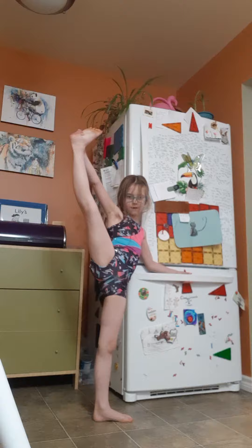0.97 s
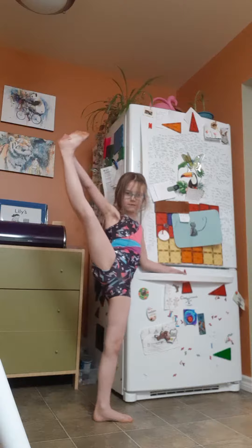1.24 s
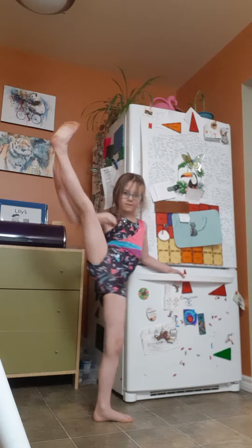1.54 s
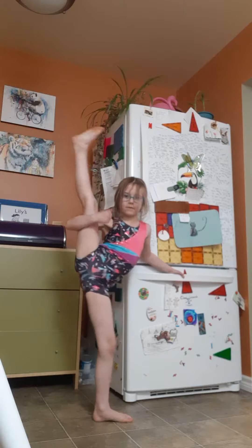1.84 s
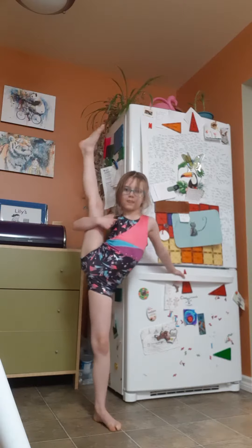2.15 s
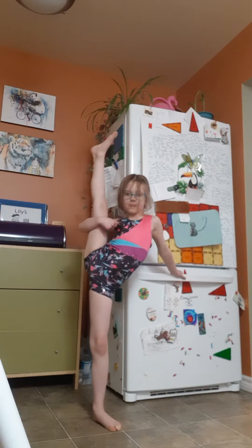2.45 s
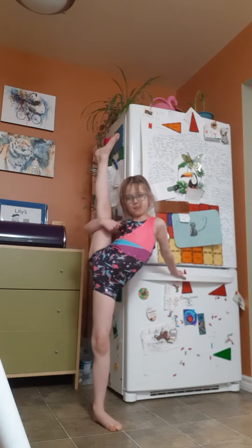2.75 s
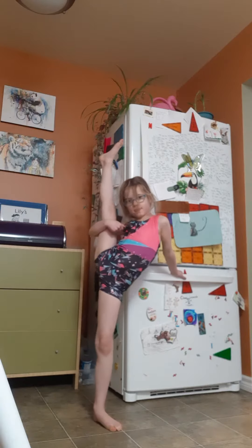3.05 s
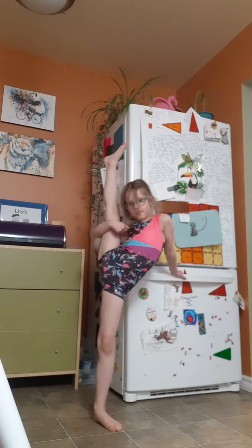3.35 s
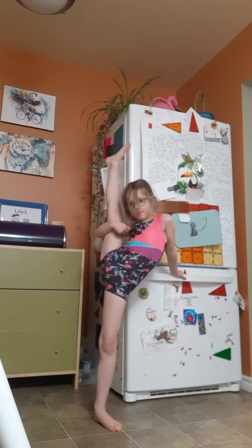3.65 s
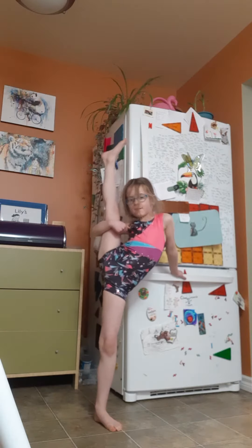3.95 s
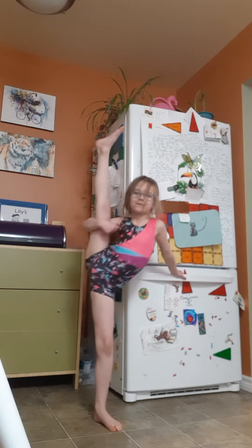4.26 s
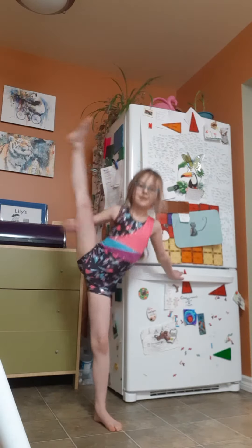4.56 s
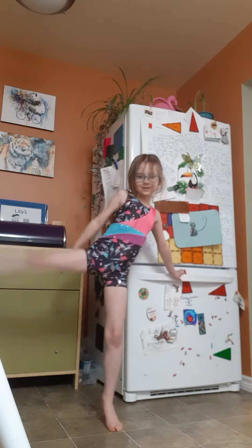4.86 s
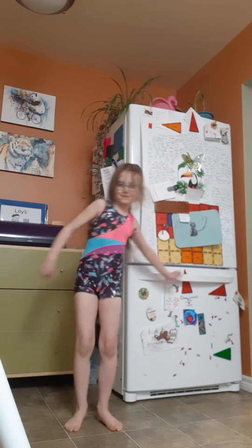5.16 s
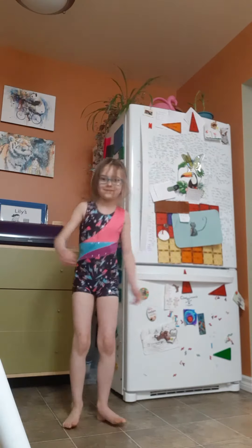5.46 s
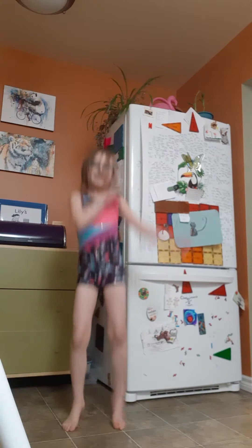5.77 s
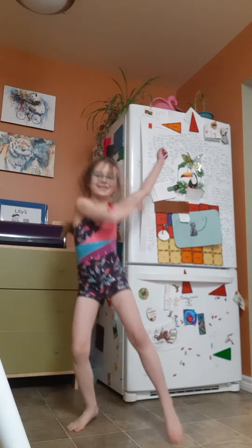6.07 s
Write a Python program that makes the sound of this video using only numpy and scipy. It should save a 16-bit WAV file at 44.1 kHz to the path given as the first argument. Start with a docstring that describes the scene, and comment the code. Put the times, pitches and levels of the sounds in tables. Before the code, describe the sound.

Something is scrubbed rapidly in a tiled kitchen, each stroke scraping and hissing over a faint rumble and a few small clicks. The rubbing pauses briefly twice and starts again. Near the end a bare foot lands with a dull thump, followed by soft shuffling and scuffs as the strokes grow lighter. The stereo microphone picks up short reflections from hard walls.

```python
"""In a tiled kitchen something is scrubbed from the start, about nine strokes a second. Stick-slip
friction scrapes and hisses, while the rubbed thing rumbles and bumps on its support. A light footfall
comes at 1.9 s; the scrubbing pauses near 2.5 s and 4 s. At 5.1 s a bare foot thumps the floor and
excites its modes, then the feet shuffle and the soles scuff the tile as the strokes grow lighter.
Throughout, hard walls reflect the sound to a microphone with two ports."""
import sys
import numpy as np
from scipy import signal
from scipy.fft import rfft, irfft, next_fast_len
from scipy.io import wavfile
from scipy.ndimage import map_coordinates

SR = 44100
rng = np.random.default_rng(int(sys.argv[2]) if len(sys.argv) > 2 else 0)


def bounce(signal):
    """Save signal as a 16-bit WAV file at the path given by the first command-line argument."""
    frames = np.transpose(np.atleast_2d(signal))
    limited = np.clip(frames, -1, 1)
    pcm = np.round(limited * 32767).astype(np.int16)
    wavfile.write(sys.argv[1], SR, pcm)


N = 270333
TIME = np.arange(N) / SR


def amp(db):
    """Amplitude ratio of a level in decibels."""
    return 10 ** (np.asarray(db) / 20)


def unit(x):
    """Normalisation to rms 1."""
    return x / np.sqrt(np.mean(x ** 2) + 1e-20)


def along(points, hz):
    """Interpolation of (f/Hz, value) points on a logarithmic frequency axis."""
    f, values = np.transpose(points)
    return np.interp(np.log(hz + 1), np.log(f + 1), values)


def filtered(x, response):
    """Linear filtering: the spectrum is multiplied by a complex frequency response."""
    size = next_fast_len(N + SR // 2)
    return irfft(rfft(x, size) * response(np.fft.rfftfreq(size, 1 / SR)), size)[..., :N]


def coloured(x, spectrum):
    """Spectral shaping by (f/Hz, relative level/dB) points, at rms 1."""
    return unit(filtered(x, lambda hz: amp(along(spectrum, hz))))


def add(track, at, sound):
    """Superposition of a short sound on a track, starting at a time in seconds."""
    part = track[round(at * SR):][:len(sound)]
    part += sound[:len(part)]


def swells(at, rise, fall, db):
    """Incoherent addition: the Gaussian envelopes of separate movements sum in power."""
    t = TIME[::32]
    offset = t - at[:, None]
    width = np.where(offset < 0, rise[:, None], fall[:, None])
    envelopes = amp(db)[:, None] * np.exp(-(offset / width) ** 2)
    return np.interp(TIME, t, np.linalg.norm(envelopes, axis=0))


def friction(spectrum, rate, spread_db, smooth):
    """Stick-slip friction: random slips of uneven size, rate a second, over smooth sliding noise."""
    size = amp(spread_db * np.minimum(rng.standard_exponential(N), 5))
    slips = (rng.random(N) < rate / SR) * size * rng.choice([-1, 1], N)
    return coloured(unit(slips) + smooth * rng.standard_normal(N), spectrum)


def ticks(contacts, spectrum, t60):
    """Damped impacts: each (t/s, peak level/dB) contact is an exponentially decaying noise burst."""
    track, t = np.zeros(N), TIME[:SR // 4]
    grain = coloured(rng.standard_normal(N), spectrum)
    for at, db in contacts:
        burst = np.roll(grain, -round(at * SR))[:len(t)] * amp(-60 * t / t60)
        add(track, at, amp(db) * burst / np.abs(burst).max())
    return track


# Reverberation time of the kitchen: f/Hz, T60/s
REVERB_TIME = [(100, 0.26), (500, 0.39), (3000, 0.34), (8000, 0.32), (15000, 0.35)]

def kitchen(x, wet_db, early_db, lead_s, positions=2):
    """Reverberation: direct sound reaches the left port first; reflections vary with source position."""
    noise = rng.standard_normal((positions, 2, SR // 3), dtype=np.float32)
    hz, t, spectra = signal.stft(noise, SR, nperseg=256)
    decay = amp(-60 * t / along(REVERB_TIME, hz)[:, None]) + amp(early_db - 60 * t / 0.017)
    tails = signal.istft(spectra * decay.astype(np.float32), SR, nperseg=256)[1]
    tails /= np.linalg.norm(tails, axis=-1, keepdims=True)
    echo, hop = np.zeros((2, N)), N // (positions - 1) + 1
    for k, pair in enumerate(tails):
        span = np.arange(max(0, (k - 1) * hop), min(N, (k + 1) * hop))
        piece = x[span] * np.cos(np.pi / 2 * (span / hop - k))  # equal-power crossfade
        for port, tail in zip(echo, pair):
            add(port, span[0] / SR, signal.fftconvolve(piece, tail))
    direct = filtered(x, lambda f: np.exp(1j * np.pi * f * lead_s * np.array([[1], [-1]])))
    return (direct + amp(wet_db) * echo) / np.hypot(1, amp(wet_db))


# Spectrum of the room's air: f/Hz, level/dB
AIR_SPECTRUM = [(20, -11), (90, 10), (200, 1), (400, -6), (1000, -14), (3000, -38), (8000, -23),
                (16000, -13)]

def room_tone():
    """Ambient noise: a faint murmur and hiss, partly coherent between the ports."""
    return amp(-73) * coloured(rng.standard_normal((2, N)) + 1.5 * rng.standard_normal(N), AIR_SPECTRUM)


# Light knocks: t/s, relative peak level/dB
KNOCK_EVENTS = [(.143, -37), (1.876, -39.5), (4.779, -33.5), (4.82, -42), (5.69, -37.5)]
# Spectrum of a knock: f/Hz, level/dB
KNOCK_SPECTRUM = [(60, -9), (200, -15), (500, -6.5), (820, -4), (1500, -11), (4000, 1.5), (12000, -16.5)]

def knocks():
    """Impulsive excitation: brief contacts give broadband sound that dies quickly."""
    return amp(5) * ticks(KNOCK_EVENTS, KNOCK_SPECTRUM, t60=0.084)


# Soles twisting on the tile: t/s of the peak, rise/s, fall/s, level/dB
SOLE_TWISTS = [(5.15, 0.014, 0.06, -61), (5.28, 0.05, 0.03, -64), (5.625, 0.042, 0.052, -62),
               (6.1, 0.03, 0.04, -58)]
# Spectra of skin sliding and of skin sticking: f/Hz, level/dB
SOLE_SPECTRUM = [(80, -20), (250, -8), (450, -4.5), (560, 2.5), (660, -4), (760, -3), (900, -13),
                 (1500, -25), (4000, -38)]
SQUEAK_SPECTRUM = [(480, -40), (590, 1), (630, -4), (680, -4), (820, -40)]

def scuffs():
    """Friction of skin on tile: sliding gives a dull rub, sticking a narrow-band squeak."""
    rub = friction(SOLE_SPECTRUM, rate=830, spread_db=4.5, smooth=1.0)
    squeak = amp(-3) * friction(SQUEAK_SPECTRUM, rate=520, spread_db=1.5, smooth=0.5)
    return swells(*np.transpose(SOLE_TWISTS)) * (rub + squeak)


# Footfalls: t/s, relative level/dB, contact time/s, f/Hz below which modes are weakly excited
FOOTFALLS = [(1.874, -43.5, 0.003, 220), (4.625, -47.5, 0.0051, 91), (5.092, -30, 0.0032, 230),
             (5.106, -41, 0.0027, 230), (5.132, -27.5, 0.0036, 35.2), (5.238, -39.5, 0.0027, 120),
             (5.302, -43, 0.0026, 158), (5.42, -46.5, 0.0051, 119), (5.678, -47, 0.0045, 169),
             (5.944, -51, 0.0061, 46), (6.075, -47, 0.0048, 160)]
# Modes of the floor: f/Hz, level/dB, T60/s
FLOOR_MODES = [(58.4, -5, 0.46), (79.1, 6.5, 0.29), (138.4, 0.5, 0.39), (170.3, 5, 0.11), (215, -14, 0.53),
               (252, -20, 0.12), (284, -7, 0.21), (377, -8.5, 0.26), (440, -4.5, 0.31), (536, -9, .15)]
# Spectrum of the dull, unpitched slap of the foot's flesh: f/Hz, level/dB
THUD_SPECTRUM = [(50, -30), (100, -9), (200, -1), (300, -0.5), (400, -21), (900, -40), (3000, -65)]

def footfalls():
    """Modal excitation: soft flesh gives the floor a half-sine push; longer contact is duller."""
    track, t = np.zeros(N), TIME[:SR // 2]
    hz, mode_db, t60 = np.transpose(FLOOR_MODES)[:, :, None]
    for at, db, contact, lowest_hz in FOOTFALLS:
        # toes stir only the higher modes, a heel bends the whole floor
        coupling = hz ** 2 / (hz ** 2 + lowest_hz ** 2)
        size = coupling * amp(mode_db + rng.normal(0, 0.91, hz.shape))
        ring = np.sum(size * amp(-60 * t / t60) * np.cos(2 * np.pi * hz * t), axis=0)
        push = np.sin(np.pi * np.minimum(t / contact, 1))
        thump = signal.fftconvolve(ring, push / push.sum())[:len(t)]
        onset = 1 - np.exp(-t / 0.0038)
        add(track, at, amp(db) * thump * onset)
    track += amp(-15.5) * ticks([row[:2] for row in FOOTFALLS], THUD_SPECTRUM, t60=0.29)
    # the floor radiates little of its slowest motion
    track = signal.sosfilt(signal.butter(2, 50, "high", fs=SR, output="sos"), track)
    return kitchen(track, wet_db=-8.5, early_db=-2, lead_s=0.00028) * amp([[-0.7], [0.7]])


# Scrubbing strokes: t/s of the peak, length/s, level/dB
SCRUB_STROKES = [(0.031, .07, -41.5), (0.125, 0.15, -48.5), (0.246, 0.084, -45), (0.35, .08, -42.5),
                 (0.451, 0.077, -42), (.551, 0.084, -44.5), (0.663, 0.078, -42.5), (0.76, 0.089, -45.5),
                 (0.878, 0.072, -40), (0.964, .12, -47.5), (1.081, 0.079, -40.5), (1.156, .12, -44.5),
                 (1.271, 0.055, -39.5), (1.369, 0.11, -47.5), (1.488, 0.07, -39), (1.588, 0.092, -41),
                 (1.711, .06, -40), (1.811, 0.081, -41.5), (1.928, 0.084, -44), (2.032, 0.077, -43),
                 (2.142, 0.07, -45.5), (2.237, 0.072, -46.5), (2.317, 0.14, -54.5), (2.514, 0.08, -64),
                 (2.599, 0.13, -69), (2.769, 0.081, -43), (2.895, .1, -34), (3.028, 0.12, -33),
                 (3.142, 0.063, -36.5), (3.206, 0.2, -43), (3.399, 0.11, -35), (3.467, 0.098, -37),
                 (3.603, 0.13, -42), (3.712, 0.066, -38), (3.779, 0.036, -42), (3.843, 0.098, -39.5),
                 (3.977, 0.12, -55.5), (4.163, 0.042, -46), (4.262, 0.091, -37), (4.378, 0.093, -41),
                 (4.496, 0.085, -47), (4.586, .17, -44), (4.738, 0.072, -45), (4.809, 0.098, -45),
                 (4.93, 0.13, -45.5), (5.038, 0.087, -43), (5.145, 0.14, -43.5), (5.274, 0.081, -42),
                 (5.393, 0.14, -43), (5.515, 0.11, -43.5), (5.648, .13, -43), (5.785, 0.15, -47),
                 (5.925, 0.087, -47), (6.078, 0.093, -44.5)]
# How hard the hand bears down: t/s, relative level/dB
HAND_PRESSURE = [(.4, 0.5), (.62, -6), (.9, 3.5), (1.85, 2.5), (2.25, -5), (2.6, -3.5), (2.9, 0), (3.6, 2),
                 (3.85, 1), (4.0, -25), (4.25, 0.5), (4.58, 2.5), (4.74, -5), (4.82, 9), (4.95, -22),
                 (5.15, 3), (5.5, -13), (5.66, -8.5), (5.85, -39)]
USUAL_STROKE_S, USUAL_STROKE_DB = 0.09, -43
SCRUB_LEAD_S = 0.000423  # earlier arrival at the left port

def strokes():
    """Reciprocating motion: each stroke speeds up, then slows, under the hand's pressure."""
    at, length, db = np.transpose(SCRUB_STROKES)
    rise_share = 0.52
    doublings = np.log2(length / USUAL_STROKE_S)
    pressure_db = np.interp(at, *np.transpose(HAND_PRESSURE))
    return at, rise_share * length, (1 - rise_share) * length, db, doublings, pressure_db


# The rubbed thing rocks against its support: t/s, relative level/dB
ROCKING = [(.16, -63.5), (0.462, -56), (.56, -61.5), (.675, -61), (.77, -65), (.885, -56), (.96, -60),
           (1.086, -54), (1.17, -58), (1.6, -56), (3.06, -69), (3.45, -67)]
# Rumble under a usual stroke: t/s, level/dB
RUMBLE_CONTOUR = [(0, -64), (1.9, -63.5), (2.3, -70), (3.2, -66.5), (3.6, -63), (3.85, -65), (4.1, -72),
                  (4.5, -65.5), (6, -63.5)]
# Spectrum of the shaken support: f/Hz, level/dB
RUMBLE_SPECTRUM = [(20, -30), (45, -15), (75, -16.5), (103, 7), (135, -2), (190, -11), (300, -15),
                   (600, -63)]
# Resonances of the rubbed thing's hollow: f/Hz, level/dB
HOLLOW_SPECTRUM = [(120, -39), (260, -15.5), (305, -3), (345, -6.5), (410, -8.5), (450, -5), (500, -11.5),
                   (620, -15), (1200, -62)]

def support(rumble_lag_s=0.011, hollow_hz=306.4):
    """Forced vibration and resonance: strokes and bumps shake the support and ring the hollow."""
    at, rise, fall, db, _, pressure_db = strokes()
    bump_at, bump_db = np.transpose(ROCKING)
    bumps = swells(bump_at, rise=np.full_like(bump_at, 0.032), fall=np.full_like(bump_at, 0.044),
                   db=bump_db)
    shake_db = np.interp(at, *np.transpose(RUMBLE_CONTOUR)) + 0.2 * (db - USUAL_STROKE_DB)
    shake = swells(at + rumble_lag_s, rise, fall, shake_db)
    rumble = np.hypot(shake, amp(-3) * bumps) * coloured(rng.standard_normal(N), RUMBLE_SPECTRUM)
    drive = np.hypot(swells(at, rise, fall, db - 34.5 + pressure_db), amp(-2.5) * bumps)
    rattle = drive * friction(HOLLOW_SPECTRUM, rate=300, spread_db=3.0, smooth=1.0)
    note = amp(-3) * bumps * np.sin(2 * np.pi * (hollow_hz * TIME + rng.random()))
    return kitchen(rumble + rattle + note, wet_db=-4, early_db=-26, lead_s=0.0001, positions=8)


# Spectrum of the rubbing hiss: f/Hz, level/dB
HISS_SPECTRUM = [(2000, -39), (4500, 5), (7000, -1.5), (9600, 1.5), (11500, -2.5), (14000, 0),
                 (16000, -0.5)]
# Slow drift of the hiss: t/s, relative level/dB
HISS_CONTOUR = [(0, 0), (1.1, 1.5), (2.2, 2.5), (2.6, -4), (3.3, -1), (3.8, 1), (4.35, -3), (4.7, 4),
                (5.3, 3.5), (5.8, -4), (6.1, 2)]

def rubbing_hiss(flutter_db=1.3, flutter_per_s=41):
    """Radiation from an extended source: the rubbed patch sends each port its own incoherent hiss."""
    at, rise, fall, db, doublings, pressure_db = strokes()
    hiss_db = -7.5 + 3.5 * doublings - 0.053 * pressure_db  # long, light strokes hiss most
    hiss_db += np.interp(at, *np.transpose(HISS_CONTOUR))
    grip = map_coordinates(rng.standard_normal(N // 100), [TIME * flutter_per_s], mode="wrap")
    envelope = swells(at, rise, fall, db + hiss_db) * amp(flutter_db * grip)
    left, right, scattered = [envelope * friction(HISS_SPECTRUM, rate=3000, spread_db=2.5, smooth=0.59)
                              for _ in range(3)]
    reverberant = kitchen(scattered, wet_db=7, early_db=7, lead_s=SCRUB_LEAD_S, positions=16)
    return amp(-4.5) * np.array([left, right]) + amp(-0.5) * reverberant


# Spectra of the bright scrape, the midrange bite and the lower rasp: f/Hz, level/dB
SCRAPE_SPECTRUM = [(900, -23), (1700, -11), (2100, -9), (2600, -3.5), (3100, 0.5), (3600, 0), (4100, 1.9),
                   (4650, -10.5), (6300, -6.5), (7400, -17), (10000, -26.5)]
BITE_SPECTRUM = [(500, -41), (950, -30.5), (1300, -10.5), (1700, -10.5), (2000, 3), (2450, 1.5),
                 (3000, 1.5), (3800, -8.5), (6000, -86)]
RASP_SPECTRUM = [(80, -48), (200, -51), (400, -7), (600, -2), (1000, 6), (1400, 8.5), (2200, 1.5),
                 (4000, -46)]
# The scrubber catches on an edge: t/s, relative peak level/dB
EDGE_CATCHES = [(.871, -35.5), (1.081, -20), (1.48, -24.5), (2.494, -51), (2.592, -53), (2.717, -49),
                (2.737, -27.5), (3.403, -24.5), (3.704, -29.5), (4.137, -45)]

def scrubbing():
    """Stick-slip friction under load: every stroke scrapes, short jabs bite, pressure adds a rasp."""
    at, rise, fall, db, doublings, pressure_db = strokes()
    scrape = swells(at, rise, fall, db - 0.5)
    scrape *= friction(SCRAPE_SPECTRUM, rate=1800, spread_db=3.0, smooth=0.66)
    bite = swells(at, rise, fall, db - 4.5 - 3 * doublings + 0.15 * pressure_db)
    bite *= friction(BITE_SPECTRUM, rate=1700, spread_db=2.5, smooth=0.57)
    # the hand's weight comes on a little after the stroke's top speed
    rasp = swells(at + 0.014, rise, fall, db - 15 + pressure_db)
    rasp *= friction(RASP_SPECTRUM, rate=800, spread_db=2.5, smooth=0.41)
    catches = (amp(1.5) * ticks(EDGE_CATCHES, SCRAPE_SPECTRUM, t60=0.011)
               + amp(1) * ticks(EDGE_CATCHES, BITE_SPECTRUM, t60=0.024)
               + amp(-8) * ticks(EDGE_CATCHES, HISS_SPECTRUM, t60=0.025))
    return (kitchen(scrape + bite + catches, wet_db=8.5, early_db=8, lead_s=SCRUB_LEAD_S, positions=100)
            + kitchen(rasp, wet_db=3.5, early_db=4, lead_s=SCRUB_LEAD_S, positions=24))


def scene():
    """Superposition: the pressures of all sources add at each port."""
    ports = scrubbing() + rubbing_hiss() + support() + footfalls()
    ports += kitchen(scuffs() + knocks(), wet_db=1, early_db=1, lead_s=0.0001, positions=12)
    return ports + room_tone()


# Sensitivity of the left port relative to the right: f/Hz, level/dB
PORT_BALANCE = [(60, -3), (120, 0.5), (200, 1), (700, 2), (1290, 2), (2380, -5), (4400, -5), (8120, 1),
                (15000, -2.5)]

def record(dry):
    """Frequency response: each port has its own colour, and nothing passes above the band limit."""
    sides, limit_hz = np.array([[0.5], [-0.5]]), 15820
    return filtered(dry, lambda hz: amp(along(PORT_BALANCE, hz) * sides) * (hz < limit_hz))


dry = scene()
out = record(dry)
bounce(out)
```